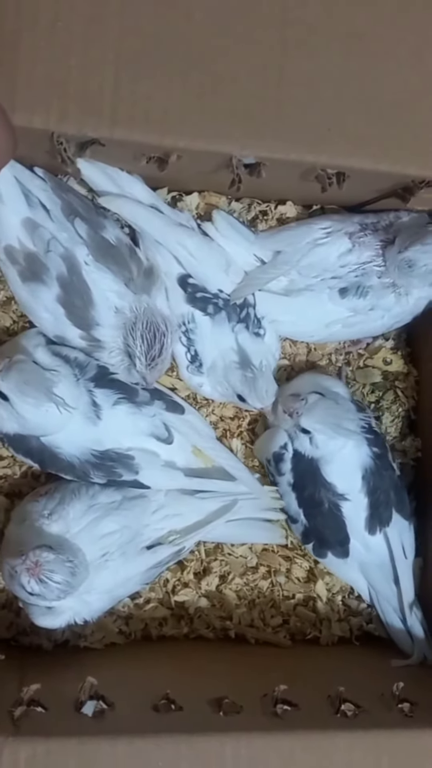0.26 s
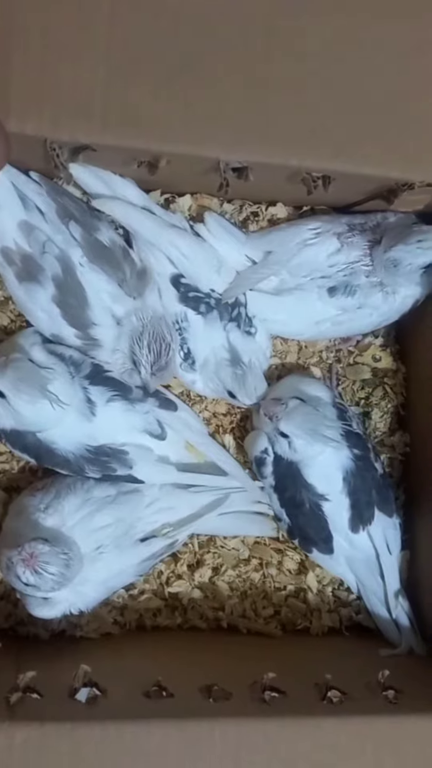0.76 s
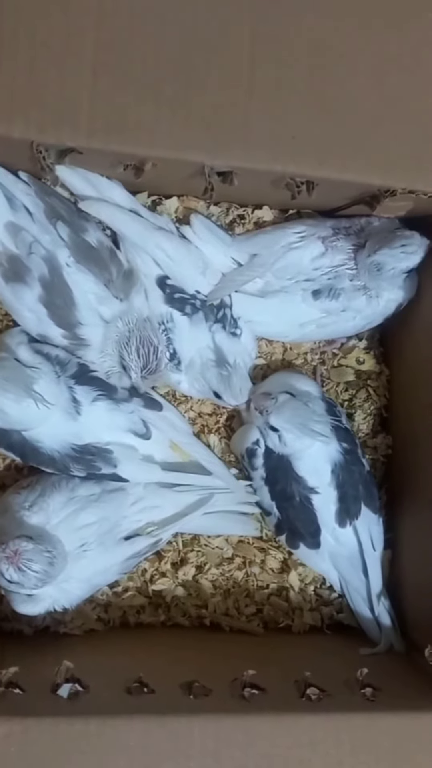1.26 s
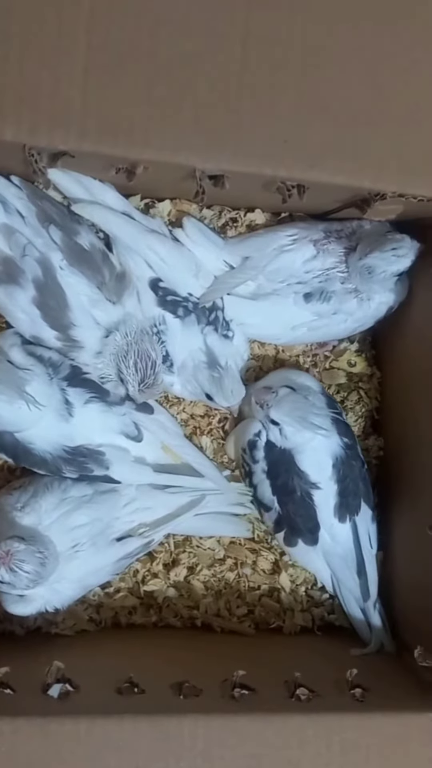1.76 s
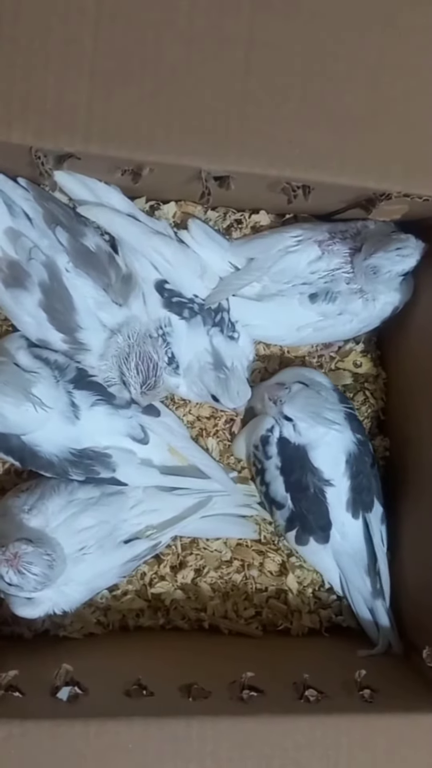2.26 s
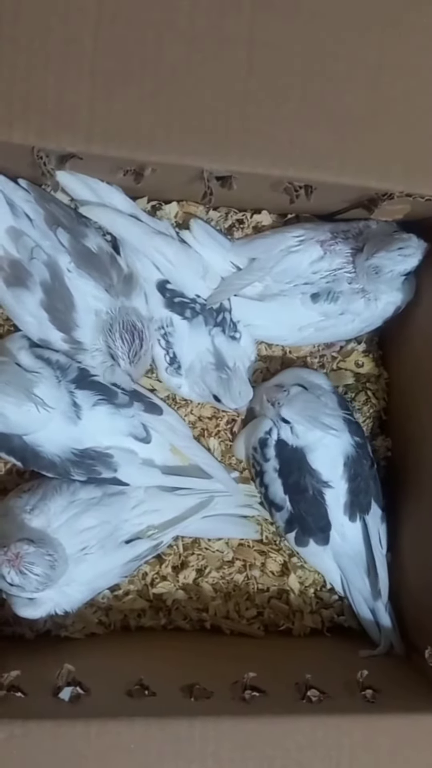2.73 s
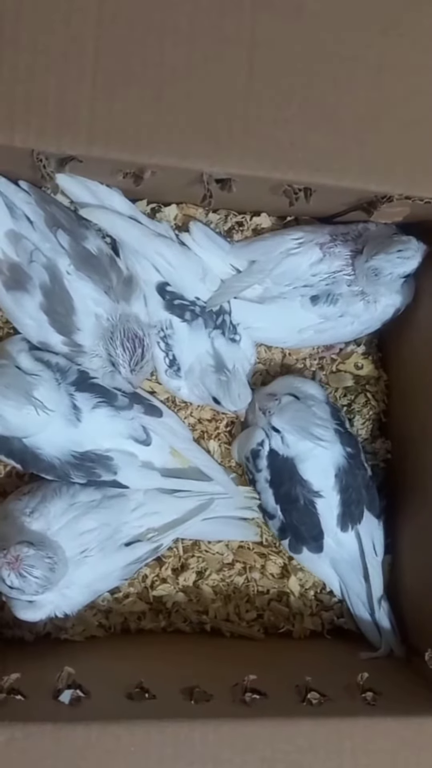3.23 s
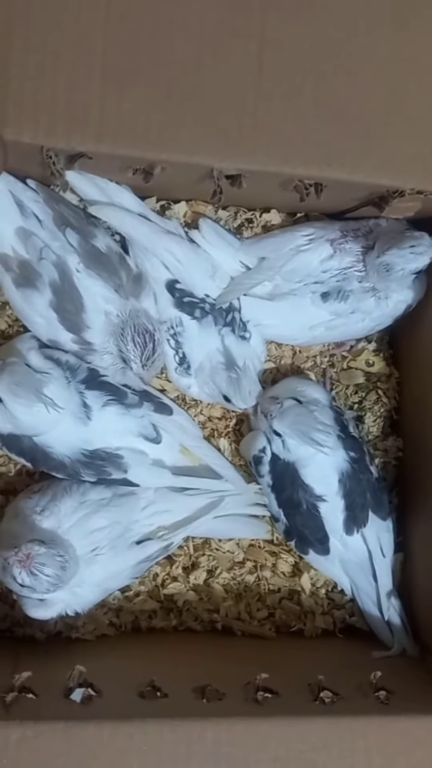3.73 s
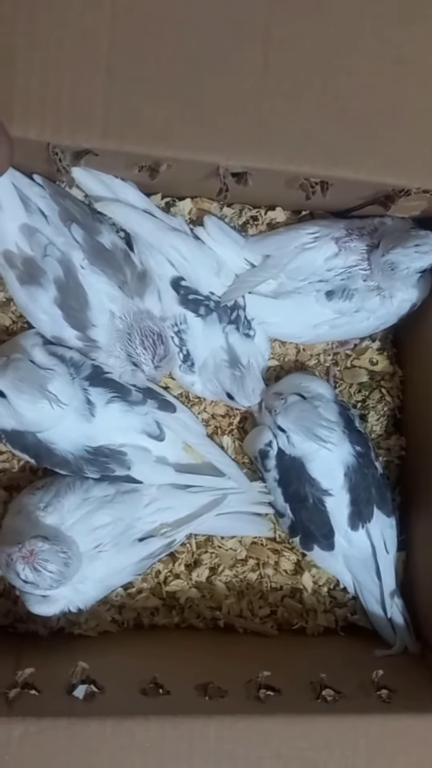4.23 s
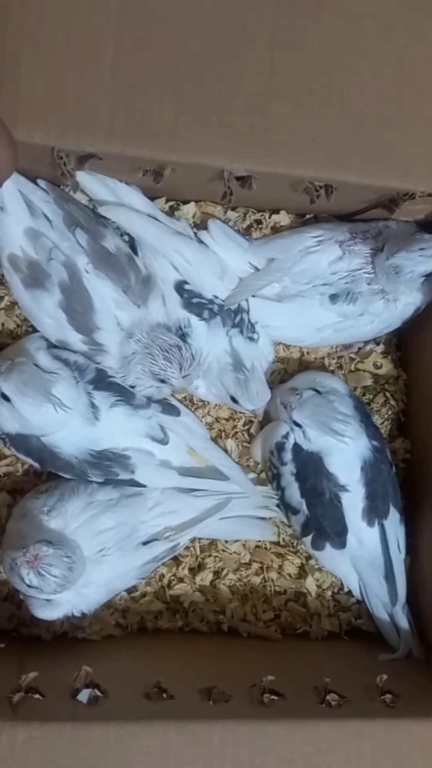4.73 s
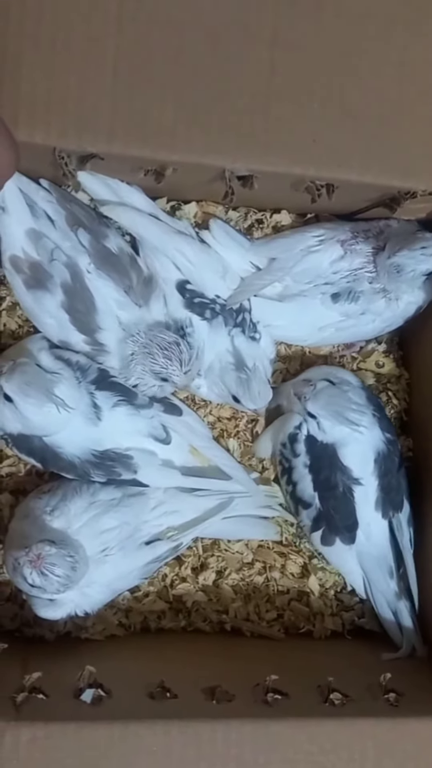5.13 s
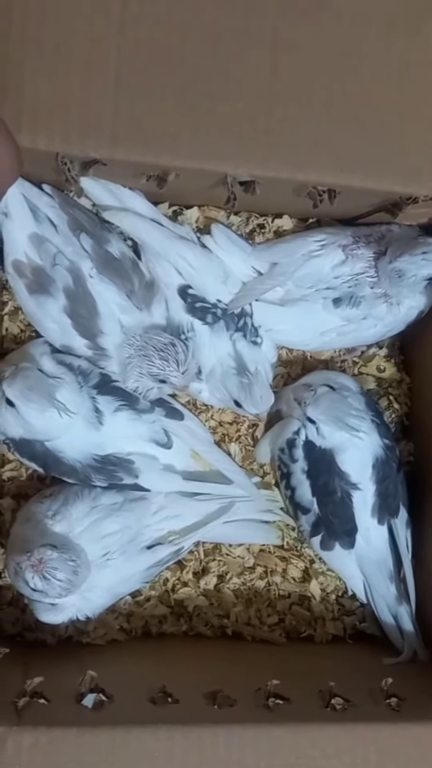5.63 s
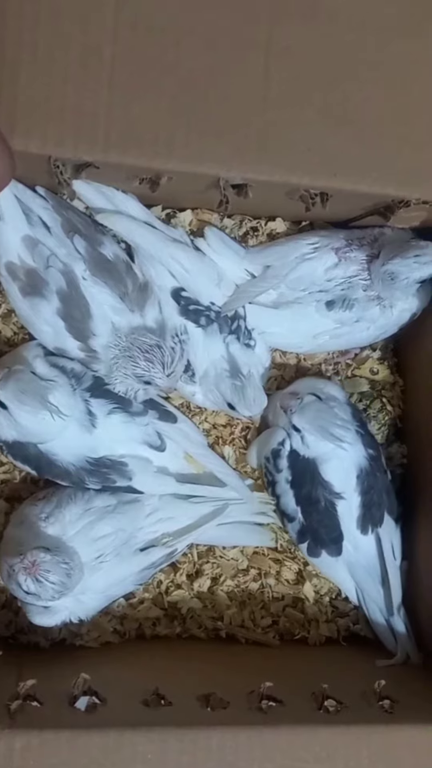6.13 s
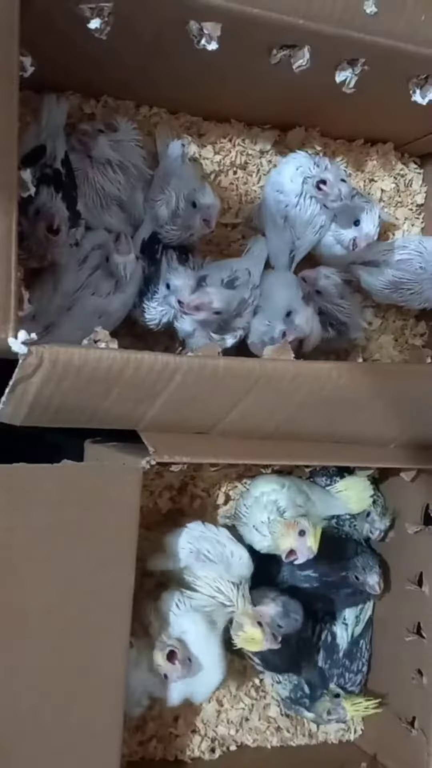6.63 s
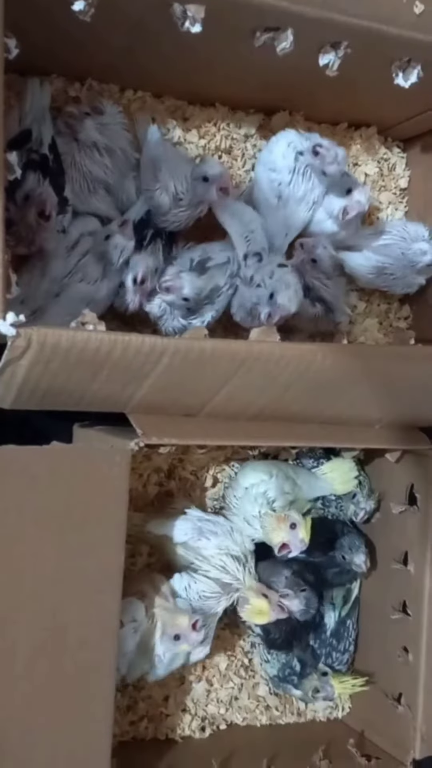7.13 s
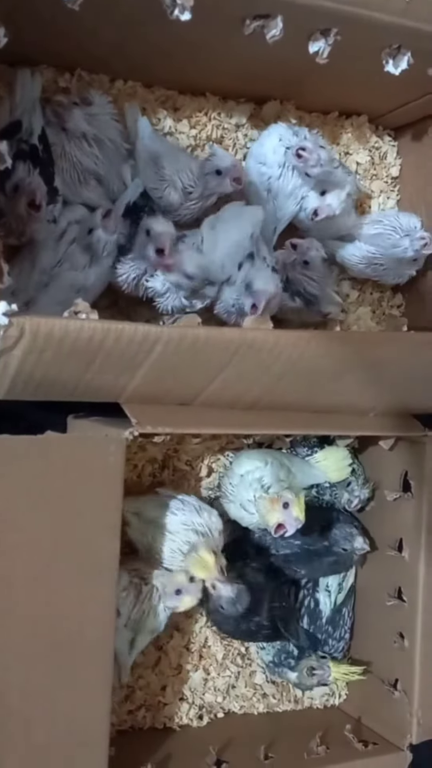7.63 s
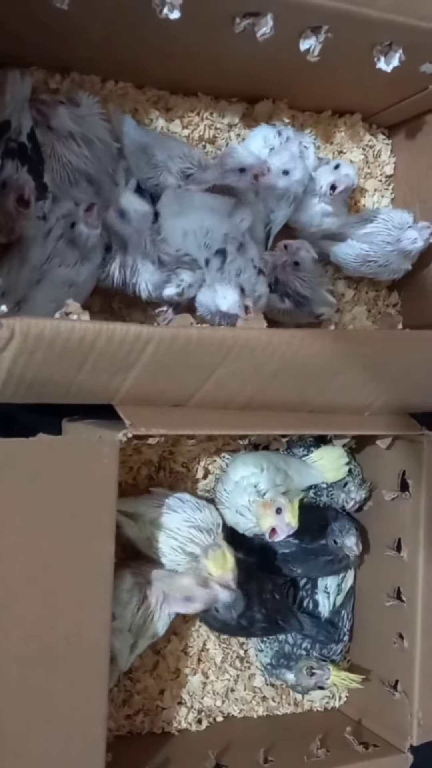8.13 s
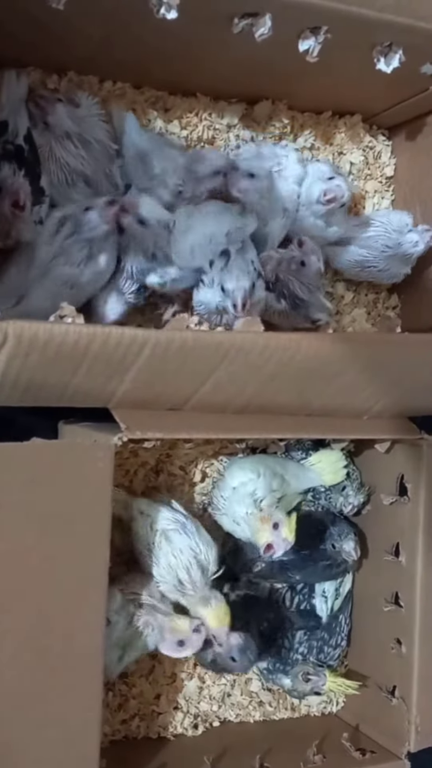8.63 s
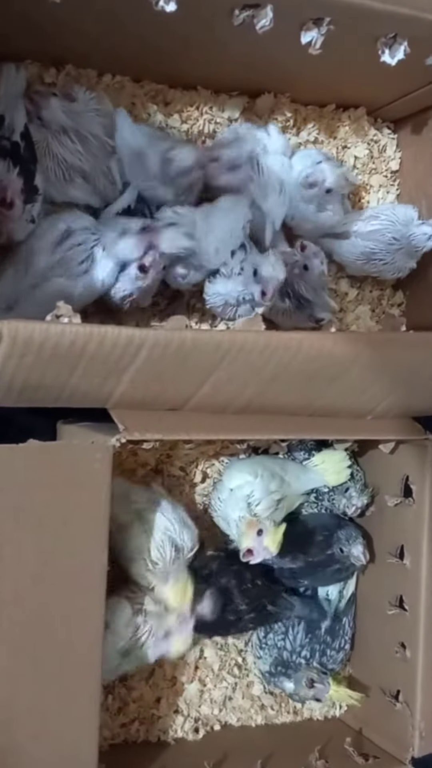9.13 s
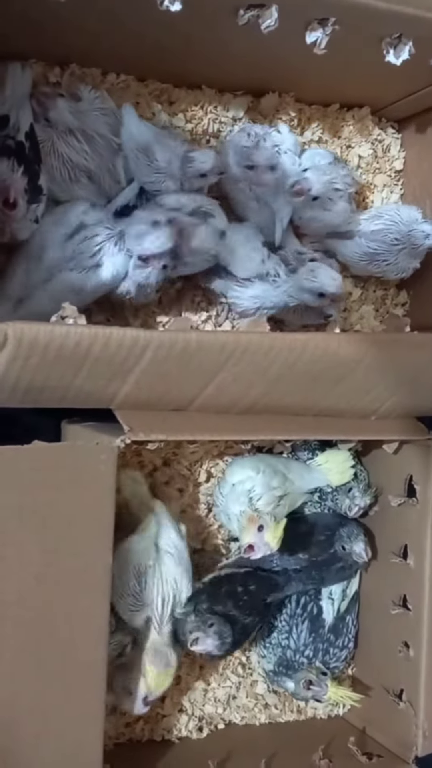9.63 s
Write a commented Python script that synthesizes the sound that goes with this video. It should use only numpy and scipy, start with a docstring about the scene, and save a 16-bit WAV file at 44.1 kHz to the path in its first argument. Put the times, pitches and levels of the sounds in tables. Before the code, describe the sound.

Close up in a cardboard box indoors, young cockatiel-like chicks give long buzzy rasps in pulses, with tiny whistles and beak clicks. Around three seconds sharp falling chirps set off noisy squeals. Low rumble, wavering hum and a thin whine lie beneath. Everything cuts off, and after a tiny gap a second room fades in with a softer, denser flock begging in a continuous blur.

```python
"""Chicks in cardboard nest boxes indoors, two scenes, two microphones; appliances hum faintly.
From 0 s near chicks rasp (slap trains through resonances), peep (gliding sines), click (noise bursts)
and, from 3.1 s, squeal (noisy partials) over rumble, mains hum and a whine. All stops at 6.51 s.
From 6.63 s a second room fades in: a far flock begs as blurred rasps, with stray calls, snapping calls
and two squeals over rumble, hum, hiss and a 307 Hz tone that dies away."""
import sys
import numpy as np
from scipy import signal
from scipy.fft import rfft, irfft, next_fast_len
from scipy.io import wavfile
from scipy.ndimage import uniform_filter1d, map_coordinates

SR = 44100
rng = np.random.default_rng(int(sys.argv[2]) if len(sys.argv) > 2 else 0)


def magnitude_from_level(level_db):
    """Linear magnitude for a level in decibels (20 dB per decade)."""
    exponent = np.asarray(level_db, float) / 20
    return 10 ** exponent


def to_wav(s):
    """Save 16-bit WAV."""
    ch = np.atleast_2d(s).T  # columns
    pcm = np.round(np.clip(ch, -1, 1) * 32767)  # PCM
    wavfile.write(sys.argv[1], SR, pcm.astype(np.int16))


N = 436149
t = np.arange(N) / SR


def unit(x):
    """Scale to rms 1."""
    return x / np.sqrt(np.mean(x ** 2) + 1e-20)


def along(points, hz):
    """Interpolate (frequency [Hz], value) points on a log-frequency axis."""
    f, v = np.transpose(points)
    return np.interp(np.log(hz + 1), np.log(f + 1), v)


def curves(rows):
    """One value per sample for each column after the time."""
    s, *cols = np.transpose(rows)
    return [np.interp(t, s, c) for c in cols]


def wobble(rate_hz):
    """Smooth random curve with rate_hz knots a second."""
    return map_coordinates(rng.standard_normal(int(N * rate_hz / SR) + 4), [t * rate_hz])


def filtered(x, response):
    """Apply a complex response of frequency."""
    m = next_fast_len(N + 8192)
    return irfft(rfft(x, m) * response(np.fft.rfftfreq(m, 1 / SR)), m)[..., :N]


def resonance(f, centre_hz, width_hz):
    """Second-order band-pass response, 1 at its centre."""
    return 1j * f * width_hz / (centre_hz * centre_hz - f * f + 1j * f * width_hz)


def phrases(rows, attack_s, release_s):
    """Rows (start, length, ..) to: gate 0-1, progress through each call -.5 to .5, other columns held."""
    s, length, *cols = np.transpose(rows)
    end = s + length
    edges = np.maximum.accumulate(np.ravel([s, end], "F"))
    gates = [np.clip(np.minimum((t - a) / attack_s + .5, (b - t) / release_s + 1), 0, 1)
             for a, b in zip(s, end)]
    progress = np.interp(t, edges, np.tile([-.5, .5], len(s)))
    held = [np.interp(t, edges, np.repeat(c, 2)) for c in cols]
    return [np.max(gates, axis=0), progress] + held


def ports(x, lag_s, walls_db, t60, size=8192):
    """Direct sound, later at the right microphone, plus wall echoes redrawn per microphone and block."""
    hop = size // 2
    u = np.arange(hop) / SR
    blocks = np.lib.stride_tricks.sliding_window_view(np.pad(x, size), size)[::hop]
    blocks = blocks * signal.get_window("hann", size)
    walls = rng.standard_normal((2, len(blocks), hop)) * magnitude_from_level(-60 * u / t60) * (u > .0006)
    walls = walls / np.linalg.norm(walls, axis=2)[..., None]
    echoes = signal.fftconvolve(blocks[None], walls, axes=2)
    where = (np.arange(len(blocks))[:, None] * hop + np.arange(echoes.shape[2])).ravel()
    echoes = np.array([np.bincount(where, e.ravel())[size:size + N] for e in echoes])
    direct = filtered(x, lambda f: np.exp(-2j * np.pi * f * np.array([[0], [lag_s]])))
    return (direct + magnitude_from_level(walls_db) * echoes) / np.hypot(1, magnitude_from_level(walls_db))


def tilt(pair, points):
    """Left-right colour difference, half applied to each microphone."""
    return filtered(pair, lambda f: magnitude_from_level(along(points, f) * np.array([[.5], [-.5]])))


def slaps(per_s, scatter_db, air, flutter_db, uneven=3):
    """Membranes slap at a drifting rate, late by uneven periods rms, over leaking air; pressure flutters."""
    rate_hz = per_s * magnitude_from_level(1.2 * wobble(12))
    beats = np.flatnonzero(np.diff(np.floor(np.cumsum(rate_hz) / SR)))
    late, size = rng.standard_normal((2, N))[:, beats]
    at = np.clip(beats + late * uneven * SR / per_s, 0, N - 1).astype(int)
    hits = np.bincount(at, magnitude_from_level(scatter_db * size), N)
    pressure = magnitude_from_level(flutter_db * (wobble(14) + wobble(45)))
    return (unit(hits - hits.mean()) + air * rng.standard_normal(N)) * pressure


# Colour given to rasps and squeals, falling away steeply above 6.5 kHz: (frequency [Hz], gain [dB])
TONE_COLOUR = [(800, 3), (1300, -1), (2720, -3.5), (2950, -5), (3130, -6), (3330, -3), (5800, -8.5),
               (6400, -9), (6900, -24.5), (7300, -50), (12000, -57)]


def tone_colour(f):
    """Linear gain of that colour."""
    return magnitude_from_level(along(TONE_COLOUR, f))


def rasp(source, modes, stretch, sway_db):
    """Windpipe and beak ring; as necks stretch, each resonance slides and swells on its own. Rms 1."""
    f, s, z = signal.stft(source, SR, nperseg=1024, noverlap=768)
    at, f = np.minimum((s * SR).astype(int), N - 1), f[:, None]
    response = 0
    for k, (hz, width_hz, db) in enumerate(modes):
        centre_hz = hz * (1 + stretch * wobble(5)[at])
        gain = (-1) ** k * magnitude_from_level(db + sway_db * wobble(7)[at])
        response += gain * resonance(f, centre_hz, width_hz)
    return unit(signal.istft(z * response * tone_colour(f), SR, nperseg=1024, noverlap=768)[1][:N])


def efforts(rows):
    """Relative level [dB] of a chorus of rasps, and of its second set of resonances."""
    gate, progress, db, swell_db, other_db = phrases(rows, attack_s=0.0064, release_s=0.012)
    db = db + swell_db * progress - 4 * (1 - gate)  # other chicks fill the gaps, 4 dB down
    return db, db + other_db


# Throat rasps: (start [s], length [s], relative level [dB], swell [dB], lower over upper resonances [dB])
THROAT_RASPS = [(0, 0.63, -28, -1, -7), (0.655, 0.13, -33, -5, -7.5), (0.826, 0.77, -32.5, 4, -9),
                (1.651, 0.74, -34.5, 3, -3.5), (2.418, 0.26, -38, 2.5, -4), (2.7, 0.16, -43, 0, 2),
                (2.899, 0.075, -42.5, -10, -3.5), (2.949, 0.86, -51, -4, -4.5), (3.777, 0.26, -39, 1, -5.5),
                (4.039, 0.18, -44, 8, -8), (4.189, 0.27, -38, 2.5, -4.5), (4.486, 0.27, -34.5, -0.5, -3),
                (4.769, 0.49, -36, -1.5, -2), (5.343, 0.26, -39.5, 5.5, -5), (5.644, 0.76, -35.5, 8, -4),
                (6.431, 0.084, -33, -8, -8.5)]
# Open-beak rasps: (start [s], length [s], relative level [dB], swell [dB], upper over lower resonances [dB])
OPEN_RASPS = [(0, .613, -22.5, -0.5, -7.5), (0.642, 0.12, -29.5, -11, -6), (0.833, 0.784, -34, 6, -2),
              (1.715, 0.71, -33.5, 1.5, -3.5), (2.437, 0.25, -34.5, 9, -5.5), (2.7, 0.2, -39, -4.5, -5),
              (2.906, 0.03, -28, -7, -5), (2.947, 0.15, -40.5, -3, -1), (3.106, 0.6, -27.5, -23, -6),
              (3.826, 0.171, -34.5, 6, -4), (4.026, 0.27, -40, 9.5, -6), (4.239, 0.304, -32.5, 13.5, -7),
              (4.565, 0.481, -30.5, 4, -4.5), (5.109, 0.11, -32, -1, -2), (5.22, .045, -35.5, 2, -1.5),
              (5.28, .012, -22.5, -1, 3), (5.32, .13, -13.5, -1, -9), (5.463, 0.071, -37.5, 3, -0.5),
              (5.567, 0.048, -37.5, -1, 3), (5.63, .02, -47.5, -1, -8), (5.662, 0.036, -34.5, 0, 1),
              (5.715, 0.069, -37.5, -1.5, -2.5), (5.797, 0.58, -31, 7, -0.5), (6.378, 0.03, -31.5, -7, -4),
              (6.422, 0.011, -21, 0.5, 1), (6.443, 0.077, -23, 0.5, -8.5)]
# Throat resonances, lower and upper set: (centre [Hz], width [Hz], relative level [dB])
THROAT_MODES = [(1269, 520, -12), (1616, 222, 0.5)], [(2036, 108, 1.5), (2533, 361, 1.5), (3120, 820, -10)]
# Beak resonances, lower and upper set: (centre [Hz], width [Hz], relative level [dB])
BEAK_MODES = [(3580, 430, -2.5), (4117, 408, 4), (4720, 400, -1.5)], [(5175, 840, 0), (5820, 733, 0)]
# Breath spectrum: (frequency [Hz], relative level [dB])
BREATH_SPECTRUM = [(7000, -50), (7800, -3), (9300, 7.5), (10000, 2), (10400, -12), (11000, -7.5),
                   (12500, -8), (13250, -14.5), (13400, -83)]


def near_rasps(squealing):
    """Slaps ring throats and open beaks, with breath past the beaks; squeals push open rasps down 20 dB."""
    closed = slaps(per_s=230, scatter_db=2, air=1.1, flutter_db=.3, uneven=.22)
    gaping = slaps(per_s=200, scatter_db=2, air=.85, flutter_db=.5, uneven=.18)
    neck = dict(stretch=.012, sway_db=.9)
    throat_db, open_db = efforts(THROAT_RASPS), efforts(OPEN_RASPS)
    throat = sum(magnitude_from_level(db + 7.0) * rasp(closed, modes, **neck)
                 for db, modes in zip(throat_db, THROAT_MODES[::-1]))
    beak = sum(magnitude_from_level(db + 5.0) * rasp(gaping, modes, **neck) for db, modes in zip(open_db, BEAK_MODES))
    unsteady = rng.standard_normal(N) * magnitude_from_level(2.7 * wobble(30) + 1.1 * wobble(5.6))
    breath = filtered(unsteady, lambda f: magnitude_from_level(along(BREATH_SPECTRUM, f)) * (f > 6500))
    beak += magnitude_from_level(-62.5 + 0.98 * (open_db[0] + 32)) * unit(breath)  # breath follows the rasp level
    return throat, beak * magnitude_from_level(-20 * squealing)


# Likeness of room noise: (frequency [Hz], left-right correlation)
LIKENESS = [(60, 0.72), (120, 0.7), (240, 0.96), (500, 0.49), (1000, .2)]


def rumble(spectrum):
    """Room noise of rms 1, more alike at the two microphones where LIKENESS is high."""
    turn = lambda f: np.arccos(np.clip(along(LIKENESS, f), -1, 1)) / 2
    colour = lambda f: magnitude_from_level(along(spectrum, f)) * [np.cos(turn(f)), np.sin(turn(f))]
    mid, side = filtered(rng.standard_normal((2, N)), colour)
    return unit(np.array([mid + side, mid - side]))


def tone(hz, waver):
    """Sine of rms 1 whose phase wavers by waver radians rms or so."""
    return np.sqrt(2) * np.sin(2 * np.pi * hz * t + waver * wobble(4.2))


# First-room rumble: (frequency [Hz], relative density [dB])
FIRST_RUMBLE = [(15, -70), (25, -29.5), (86, -11), (120, -2), (183, -9), (323, -13.5), (447, -5),
                (484, -18), (659, -25), (1200, -21.5), (1560, -67), (2640, -120)]
# Wavering mains hum: (time [s], level [dB rms])
FIRST_HUM = [(0, -70), (.27, -83), (.35, -60), (.75, -51.5), (1.75, -61), (1.95, -68), (2.65, -62),
             (2.95, -56), (4.2, -54), (4.7, -93), (5.05, -74.5), (5.45, -49.5), (6.5, -57)]


def first_room():
    """Rumble, a wavering mains hum and a steady appliance whine with its lower octave."""
    octave = magnitude_from_level(-9.0) * tone(223.6, waver=0.64)
    whine = tone(447.3, waver=0.12) * magnitude_from_level([[2.5], [-2.5]]) + octave  # left, right dB
    hum = magnitude_from_level(curves(FIRST_HUM)[0]) * tone(120, waver=0.32)
    return magnitude_from_level(-52) * rumble(FIRST_RUMBLE) + hum + magnitude_from_level(-55) * whine


# Whistles: (start [s], length [s], from [Hz], to [Hz], relative peak [dB])
WHISTLE_NOTES = [(.619, 0.0048, 5550, 4570, -4.5), (.621, 0.0082, 3900, 3220, 0),
                 (2.664, 0.0087, 5950, 5730, -16.5), (2.665, 0.0093, 4720, 4500, -12.5),
                 (2.904, 0.036, 4580, 6100, -17.5), (2.982, 0.07, 4540, 6150, -30),
                 (3.042, 0.064, 6200, 5220, -28.5), (3.256, 0.016, 5650, 5530, -12),
                 (3.409, 0.0067, 1260, 1030, -35), (3.505, .02, 4360, 4300, -24),
                 (3.522, 0.036, 4450, 6000, -26), (3.57, 0.018, 1360, 1140, -35),
                 (3.578, 0.01, 3756, 3630, -4), (3.639, 0.004, 5100, 4880, -15),
                 (5.304, 0.009, 4680, 4340, -11.5), (3.656, 0.093, 2360, 3020, -31),
                 (5.274, 0.0038, 5970, 5580, -16), (5.275, 0.014, 5360, 4350, -20),
                 (5.444, 0.0052, 2710, 2280, -15), (5.659, 0.0053, 5740, 5620, -20.5),
                 (5.66, 0.0046, 4600, 4430, -19), (3.232, 0.019, 4740, 5880, -28),
                 (3.383, 0.026, 4600, 5900, -39), (6.447, 0.0054, 5060, 4800, -9.5)]
# Sudden falling peeps: (start [s], length [s], relative peak [dB], lower note relative peak [dB],
# share of rasps and squeals left)
CHIRP_NOTES = [(3.107, 0.0083, -7, -18, 0.28), (3.259, 0.0099, -6.5, -12, 0.44),
               (3.406, 0.014, -7, -15, 0.22), (3.565, .015, -6.5, -20, 0.41),
               (5.297, .011, -7.5, -13, 0.34), (6.439, 0.006, -3, -5.5, 0.12)]


def peeps():
    """Gliding whistles with a weak octave; chirps drop to a lower note. Also the hush gain around chirps."""
    chirp_hz, lower_hz = (5750, 4630), (4190, 3130)  # (from, to)
    lower_after, lower_s, hush_s = 0.85, 0.0128, 0.011  # start as share of the chirp; length; hush lead
    out, going, hoarse = np.zeros(N), np.ones(N), wobble(700)
    notes = WHISTLE_NOTES + [(s, length, *chirp_hz, db) for s, length, db, *_ in CHIRP_NOTES]
    notes += [(s + lower_after * length, lower_s, *lower_hz, db) for s, length, _, db, _ in CHIRP_NOTES]
    for s, length, from_hz, to_hz, db in notes:
        start = round(s * SR)
        u = np.arange(round(length * SR)) / (length * SR)
        phase = 2 * np.pi * length * (from_hz * u + (to_hz - from_hz) * u * u / 2)
        flutter = 1 + (.08 + 9 * length) * hoarse[start:][:len(u)]  # long notes break up more
        swell = np.sin(np.pi * u ** 1.1) ** 0.79 * flutter
        out[start:][:len(u)] += magnitude_from_level(db) * swell * (np.sin(phase) + 0.012 * np.sin(2 * phase))
    for s, length, *_, left in CHIRP_NOTES:
        going[round((s - hush_s) * SR):round((s + length) * SR)] = np.clip(left, 0, 1)
    return out, uniform_filter1d(going, size=120)


# Beak clicks: (time [s], relative level [dB])
BEAK_CLICKS = [(0.621, -22.5), (2.905, -54), (3.109, -33.5), (3.261, -48.5), (3.4107, -56.5),
               (3.582, -28.5), (3.641, -61), (5.2976, -57), (5.594, -51), (5.659, -51.5), (6.443, -58.5)]


def clicks():
    """A beak shuts with a dry tick: high-passed noise falling 60 dB in 5.9 ms."""
    out, u = np.zeros(N), np.arange(200) / SR
    for s, db in BEAK_CLICKS:
        out[round(s * SR):][:len(u)] += magnitude_from_level(db + 2.5 - 60 * u / 0.0059) * rng.standard_normal(len(u))
    return filtered(out, lambda f: f * f / (f * f + 1500 ** 2))


def squeal(sounding, hz, db, partials, lock, smear_hz):
    """Half-locked oscillator: partials are part tone, part noise band widening with order; hz is partial 2."""
    phase = np.pi * np.cumsum(hz * (1 + 0.014 * wobble(60))) / SR
    tones = sum(magnitude_from_level(level) * unit(lock + wobble(k * smear_hz)) * np.sin(k * phase) for k, level in partials)
    return sounding * magnitude_from_level(db) * filtered(tones, tone_colour)


# Squeals: (start [s], length [s], second partial [Hz], relative level [dB], relative beak ring [dB])
SQUEAL_CALLS = [(3.117, 0.15, 3450, -34, 3), (3.27, 0.1276, 3445, -32, 5.5), (3.42, 0.11, 3540, -31.5, 5),
                (3.58, 0.11, 3660, -28, 5.5), (3.68, 0.14, 3697, -38, 3.5), (5.312, 0.15, 3500, -32, 6)]
# Squeal partials: (multiple, relative level [dB])
SQUEAL_PARTIALS = [(1, -18), (2, 11), (4, -0.5), (5, 20), (6, 17.5)]
# Ring of the squealing beak: (centre [Hz], width parameter [Hz], relative level [dB])
SQUEAL_RING = [(4880, 600, 0), (5520, 520, 1)]


def near_squeals():
    """Partials fade 9 dB over each squeal while slaps ring the beak. Also the gate of the squeals."""
    sounding, progress, hz, db, ring_db = phrases(SQUEAL_CALLS, attack_s=0.0064, release_s=0.022)
    db = db - 9 * progress + 0.61 * wobble(35)
    squeals = squeal(sounding, hz, db, SQUEAL_PARTIALS, lock=.7, smear_hz=330)
    ring = lambda f: tone_colour(f) * sum((-1) ** k * magnitude_from_level(g) * resonance(f, c, w) ** 3
                                           for k, (c, w, g) in enumerate(SQUEAL_RING))
    source = slaps(per_s=360, scatter_db=4.5, air=0.92, flutter_db=1.5, uneven=0.28)
    squeals += sounding * magnitude_from_level(db + ring_db - 4) * unit(filtered(source, ring))
    return squeals, sounding


def thin_squeal(rows, lock, smear_hz):
    """Second partial alone, gliding."""
    gate, progress, hz, glide_hz, db = phrases(rows, attack_s=0.012, release_s=0.0084)
    return squeal(gate, hz + glide_hz * progress, db, [(2, 0)], lock, smear_hz)


# Near thin squeals: (start [s], length [s], mid pitch [Hz], glide [Hz], relative level [dB])
NEAR_THIN_SQUEALS = [(4.183, .024, 4050, 20, -24), (4.232, .045, 4050, 40, -25),
                     (4.282, .056, 4150, -40, -22), (4.345, .048, 4300, 400, -22),
                     (4.4, .07, 4950, -120, -19), (4.476, .05, 4470, -40, -18),
                     (4.528, .018, 5000, 60, -17)]
# Near colour difference: (frequency [Hz], left over right [dB])
NEAR_LEFT_OVER_RIGHT = [(60, -6.5), (96, -22.5), (150, -16.5), (240, 0.5), (390, 28), (620, 2), (980, 3),
                        (1560, -1), (2490, -5), (3970, -2), (6320, 7.5)]


def near_chicks():
    """Each voice type gets its own wall echoes; rasps and squeals hush around chirps."""
    whistles, going = peeps()
    squeals, squealing = near_squeals()
    whistles = whistles + thin_squeal(NEAR_THIN_SQUEALS, lock=1.3, smear_hz=150)
    throat, beak = near_rasps(squealing)
    lag_s = .000162
    pair = ports(throat * going, lag_s, walls_db=3, t60=.035, size=3072)
    pair += ports(beak * going, lag_s, walls_db=2.5, t60=.03, size=3072)
    pair += ports(magnitude_from_level(4.0) * squeals * going, lag_s, walls_db=4, t60=.025, size=3072)
    pair += ports(whistles + clicks(), lag_s, walls_db=-7, t60=.02)
    return tilt(pair, NEAR_LEFT_OVER_RIGHT)


# Second-room rumble: (frequency [Hz], relative density [dB])
SECOND_RUMBLE = [(15, -40), (25, -20), (70, -11), (95, -15), (118, -7), (205, -10), (557, -13), (1100, -8),
                 (1430, -31), (2420, -120)]
# Mains hum: (frequency [Hz], level [dB rms])
SECOND_HUM = [(60, -72.5), (120, -57.5)]
# 307 Hz tone: (time [s], level [dB rms])
DYING_TONE = [(6.6, -63.5), (8.2, -65.5), (8.35, -67), (9.89, -100)]
# Hiss: (frequency [Hz], relative level [dB])
HISS_SPECTRUM = [(6500, 6), (7000, 3), (7700, 0.5), (9000, 0.5), (11500, 3.5), (13250, -0.5), (13400, -80)]


def second_room():
    """Rumble, mains hum, a tone that dies away, and faint treble hiss."""
    hum = sum(magnitude_from_level(db) * tone(hz, waver=.2) for hz, db in SECOND_HUM)
    dying = magnitude_from_level(curves(DYING_TONE)[0]) * tone(307, waver=0.33)
    hiss = filtered(rng.standard_normal((2, N)), lambda f: magnitude_from_level(along(HISS_SPECTRUM, f)) * (f > 6000))
    return magnitude_from_level(-54.5) * rumble(SECOND_RUMBLE) + hum + dying + magnitude_from_level(-60.0) * unit(hiss)


# Flock: (time [s], relative level [dB], open beaks over throats [dB])
FLOCK_LEVEL = [(6.9, -44.5, 0.5), (7.9, -43.5, 1), (8.15, -48, 3), (8.5, -50.5, 3.5), (8.85, -46, -0.5),
               (9.05, -44, -0.7), (9.4, -45.5, -1.3), (9.89, -46, 0)]
# Several far chicks call at once: (time [s], boost [dB])
FLOCK_SURGES = [(8.02, 1.5), (8.105, 2.5), (8.25, 1.5), (8.4, 1), (8.52, 5.5), (8.605, 1.5), (8.71, 0.5),
                (9.05, 2.5), (9.2, 2), (9.28, 2.5), (9.365, 3.5), (9.51, 3), (9.66, 3.5), (9.85, 5)]
# Far throat resonances: (centre [Hz], width [Hz], relative level [dB])
FAR_THROAT_MODES = [(1440, 275, -2), (1880, 465, 1.5), (2487, 720, -1.5)]
# Far beak resonances: (centre [Hz], width [Hz], relative level [dB])
FAR_BEAK_MODES = [(3285, 780, -4), (3920, 780, 0.5), (4630, 740, 0.5), (5300, 660, 1.5), (5760, 780, -1.5)]


def far_rasps():
    """Many chicks blur: slaps scattered over several periods, drawn separately per microphone."""
    throat_db, gape_db = curves(FLOCK_LEVEL)
    surge_s = 0.017  # standard deviation
    throat_db = throat_db + sum(db * np.exp(-((t - s) / surge_s) ** 2 / 2) for s, db in FLOCK_SURGES)
    beak_db = throat_db + gape_db
    crowd = lambda modes: np.array([rasp(slaps(per_s=500, scatter_db=3, air=.76, flutter_db=.9), modes,
                                         stretch=.035, sway_db=1.6) for side in "LR"])
    return magnitude_from_level(throat_db + 7.5) * crowd(FAR_THROAT_MODES) + magnitude_from_level(beak_db + 7.5) * crowd(FAR_BEAK_MODES)


def stray_calls(count=70):
    """Single far chicks stand out for a moment, each with its own pitch, glide and strength."""
    span_s, pitch_hz = (6.8, 9.85), (3600, 6000)
    out, hoarse = np.zeros(N + SR), np.pad(1 + .8 * wobble(350), (0, SR))
    for when, pitch, glide, size, long in rng.random((count, 5)):
        length_s = .04 * (0.39 + long)
        start = round(np.interp(when, [0, 1], span_s) * SR)
        u = np.arange(round(length_s * SR)) / (length_s * SR)
        hz = np.interp(pitch, [0, 1], pitch_hz) + 500 * (glide - .5) * u
        swell = magnitude_from_level(-42 - 8 * size) * np.sin(np.pi * u) * hoarse[start:][:len(u)]
        out[start:][:len(u)] += swell * np.sin(2 * np.pi * np.cumsum(hz) / SR)
    return out[:N]


# Loudest far calls: (time, 4.5 ms before the peak [s], relative peak [dB], pitch at the peak [Hz])
SNAP_CALLS = [(7.3155, -22.5, 5550), (7.3693, -28, 5610), (7.7403, -43, 4860), (8.007, -25, 5540),
              (8.2395, -31, 4500), (8.378, -30, 5440), (8.991, -35, 4600), (9.357, -30, 4450),
              (9.5344, -24.5, 5420), (9.8428, -31, 5870)]


def far_snaps():
    """Falling sines that swell and die exponentially within milliseconds."""
    snaps, u = np.zeros(N + SR), np.arange(-400, 800) / SR
    for s, db, hz in SNAP_CALLS:
        call = np.exp(-np.abs(u) / 0.0047) * np.sin(2 * np.pi * hz * u * (1 - 6 * u))
        snaps[round(s * SR) - 200:][:len(u)] += magnitude_from_level(db - 2.5) * call
    return snaps[:N]


# Far squeals: (start [s], length [s], mid pitch [Hz], glide [Hz], relative level [dB])
FAR_THIN_SQUEALS = [(8.16, 0.094, 4290, 20, -34), (8.27, 0.087, 4420, 100, -31)]
# Far colour difference: (frequency [Hz], left over right [dB])
FAR_LEFT_OVER_RIGHT = [(60, -7), (130, 6), (280, -15), (620, 0), (1340, 5), (2910, -4), (6320, 10.5)]


def flock():
    """Blurred rasps, unlike at the two microphones, under single calls heard mostly as wall echoes."""
    pair = far_rasps()
    singles = far_snaps() + thin_squeal(FAR_THIN_SQUEALS, lock=.4, smear_hz=200) + stray_calls()
    return tilt(pair + ports(singles, lag_s=.0001, walls_db=16.0, t60=0.066), FAR_LEFT_OVER_RIGHT)


def scene():
    """The first scene ends abruptly; after a short silence the second fades in."""
    cut_s, fade_start_s, fade_time_constant_s = 6.5095, 6.632, 0.08
    fade_in = 1 - np.exp(-np.clip(t - fade_start_s, 0, None) / fade_time_constant_s)
    return (near_chicks() + first_room()) * (t < cut_s) + (flock() + second_room()) * fade_in


def gain_control(x):
    """Loud moments pull the gain down within milliseconds; it climbs back at a steady rate in dB."""
    threshold_db, share, attack_s, recover_db_per_s = -21.5, 0.51, 0.0017, 107  # share of excess removed
    level_db = 10 * np.log10(np.abs(uniform_filter1d(np.mean(x ** 2, axis=0), size=130)) + 1e-12)
    climb_db = recover_db_per_s * t
    excess_db = np.clip(level_db - threshold_db, 0, None)
    over_db = np.maximum.accumulate(excess_db + climb_db) - climb_db  # peak hold, linear release
    keep = np.exp(-1 / (attack_s * SR))
    return x * magnitude_from_level(-share * signal.lfilter([1 - keep], [1, -keep], over_db))


def band_limit(x):
    """A steep low-pass at the top of the band."""
    return signal.sosfilt(signal.butter(12, 15800, fs=SR, output="sos"), x)


def record(dry):
    """Level the mix with the gain control and finish it."""
    mix = gain_control(dry)
    return band_limit(mix)


dry = scene()
out = record(dry)
to_wav(out)
```